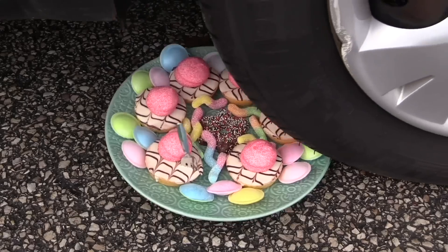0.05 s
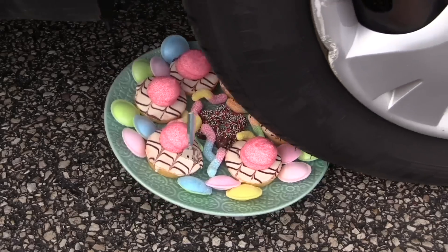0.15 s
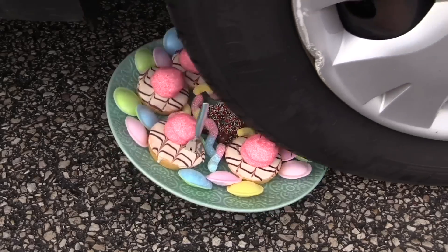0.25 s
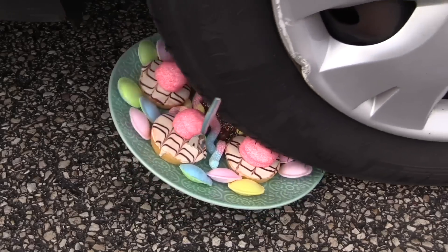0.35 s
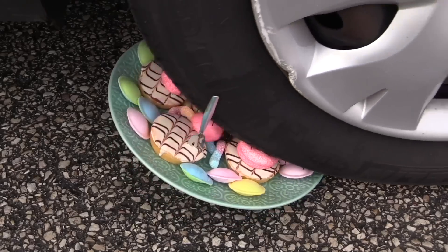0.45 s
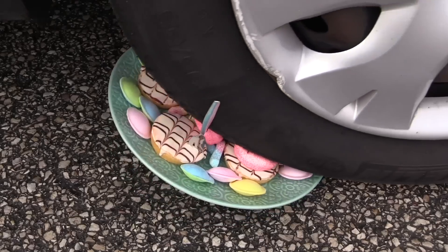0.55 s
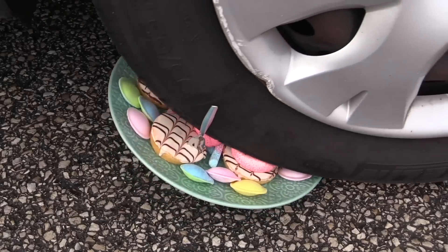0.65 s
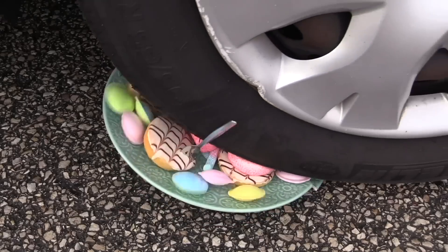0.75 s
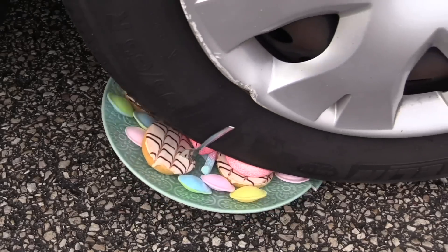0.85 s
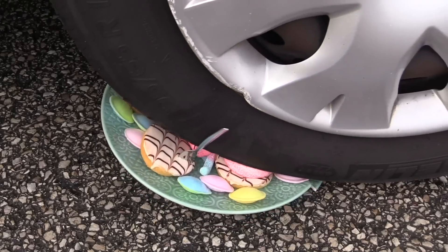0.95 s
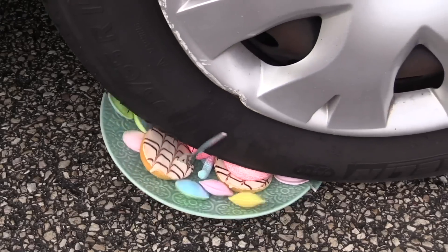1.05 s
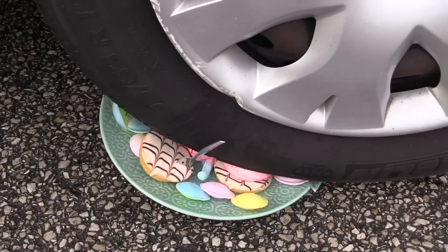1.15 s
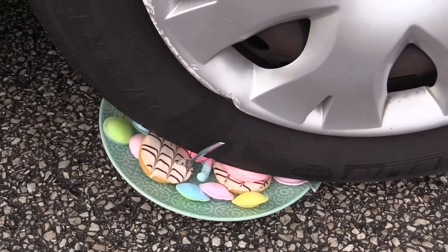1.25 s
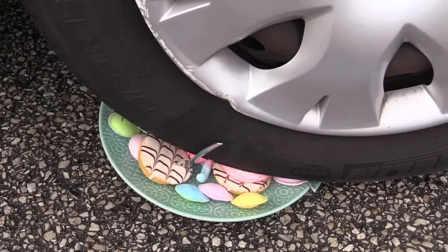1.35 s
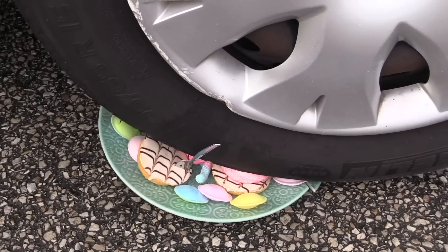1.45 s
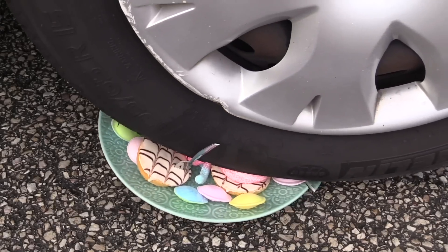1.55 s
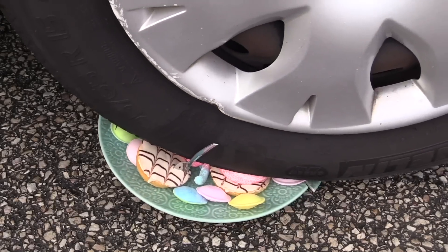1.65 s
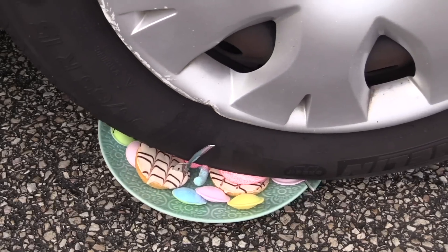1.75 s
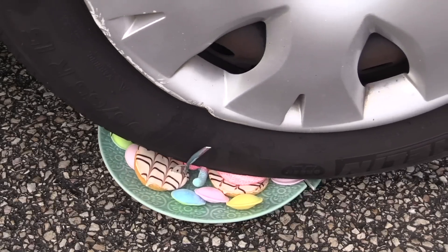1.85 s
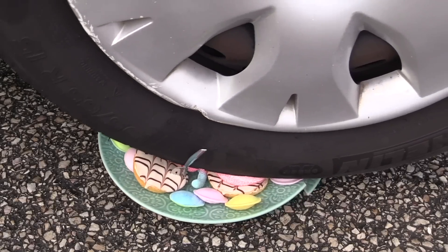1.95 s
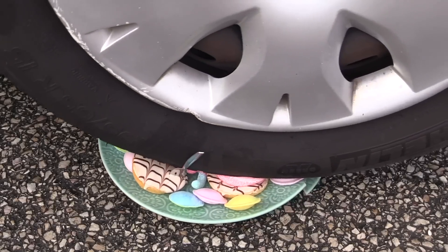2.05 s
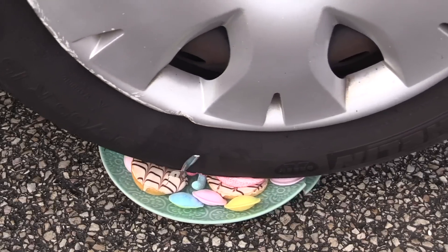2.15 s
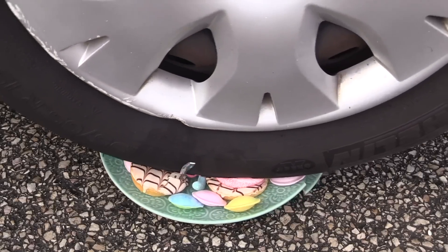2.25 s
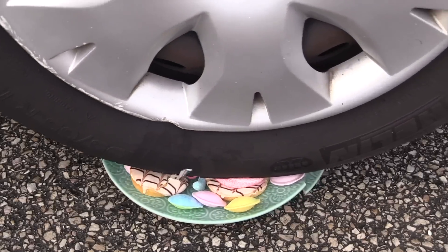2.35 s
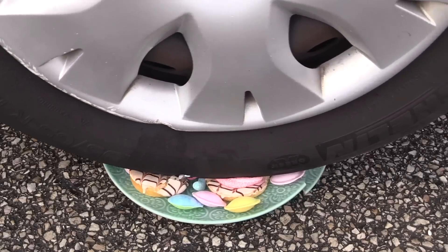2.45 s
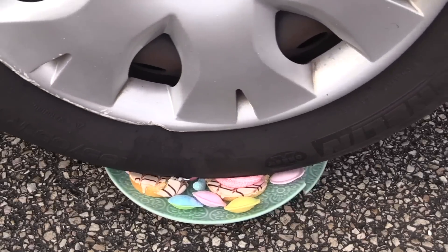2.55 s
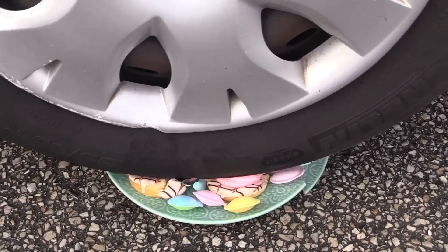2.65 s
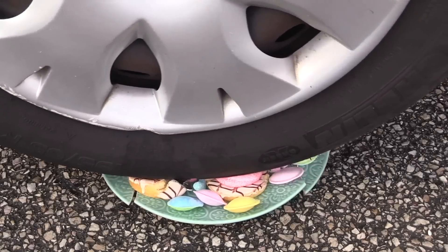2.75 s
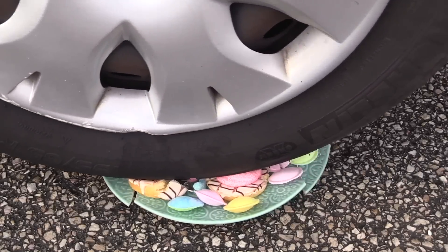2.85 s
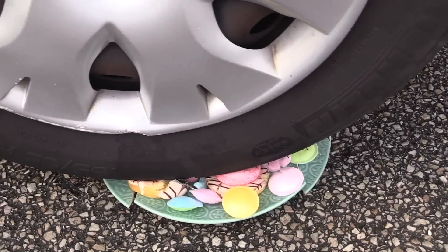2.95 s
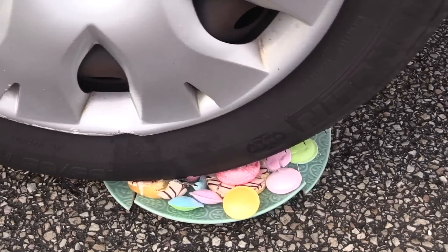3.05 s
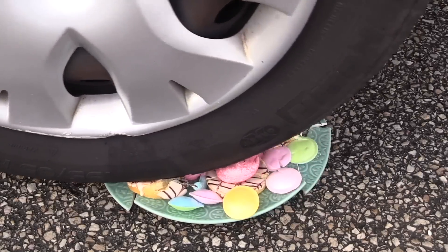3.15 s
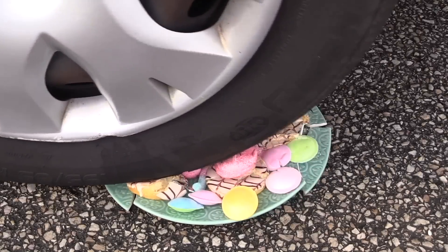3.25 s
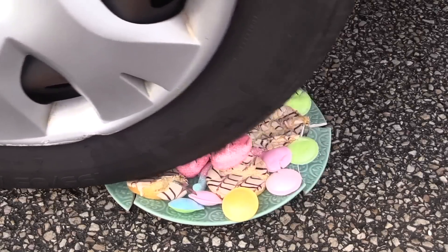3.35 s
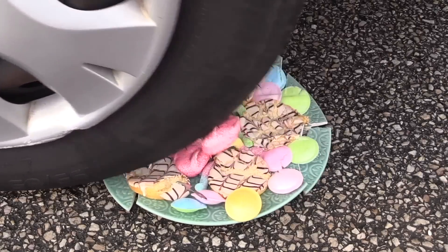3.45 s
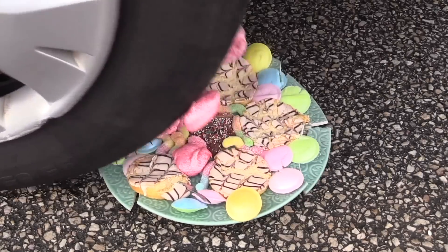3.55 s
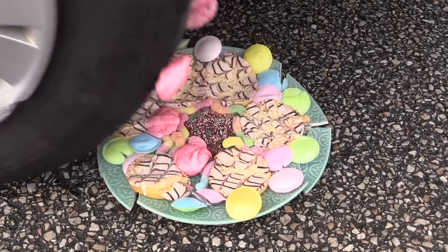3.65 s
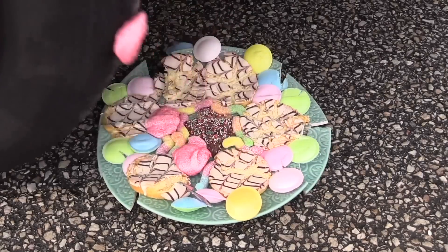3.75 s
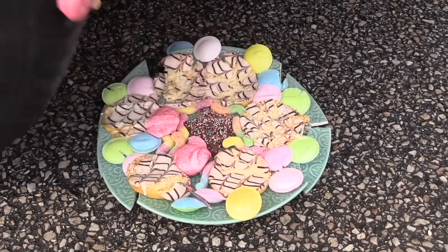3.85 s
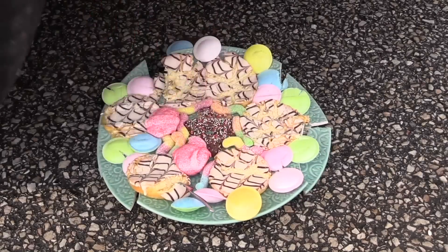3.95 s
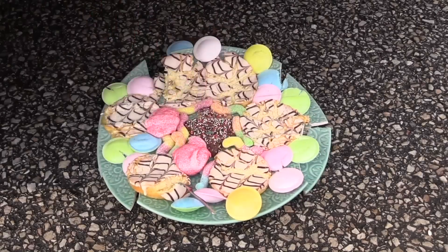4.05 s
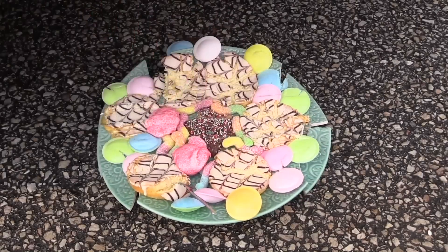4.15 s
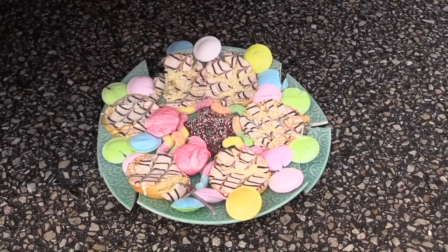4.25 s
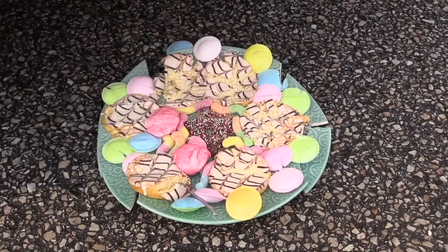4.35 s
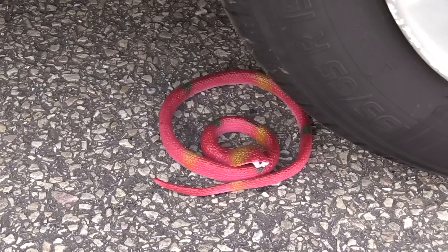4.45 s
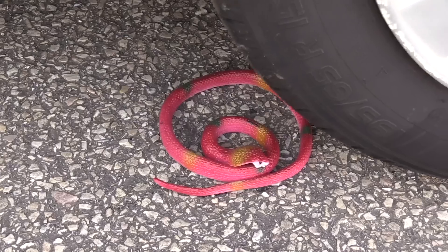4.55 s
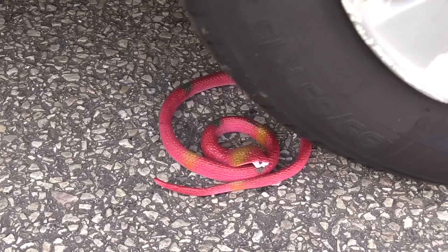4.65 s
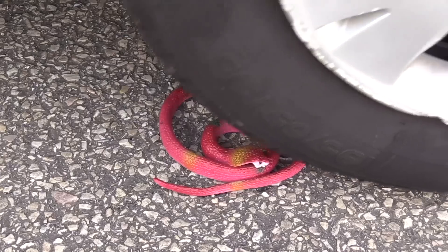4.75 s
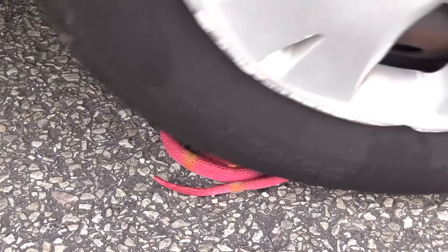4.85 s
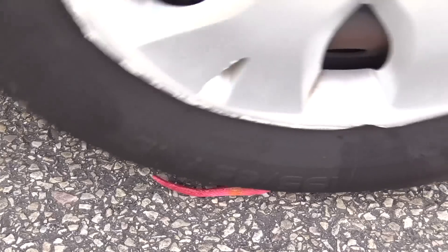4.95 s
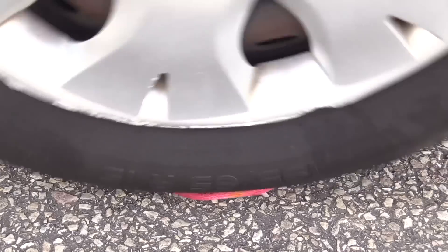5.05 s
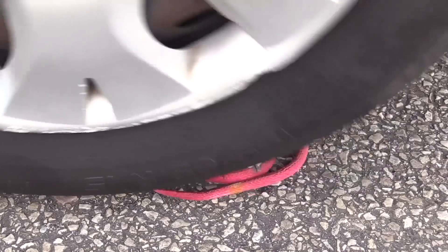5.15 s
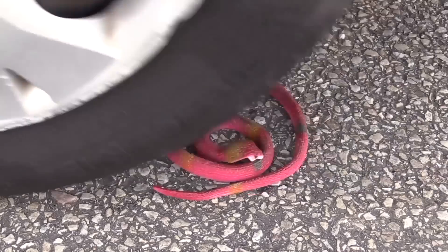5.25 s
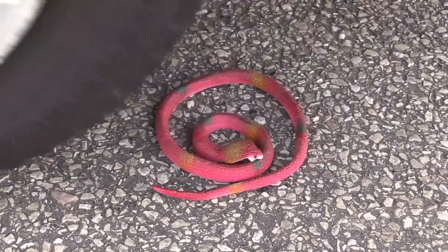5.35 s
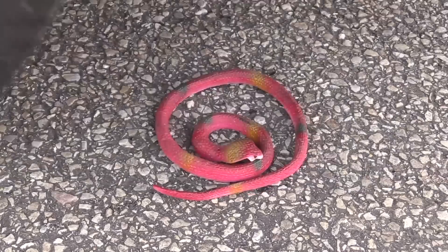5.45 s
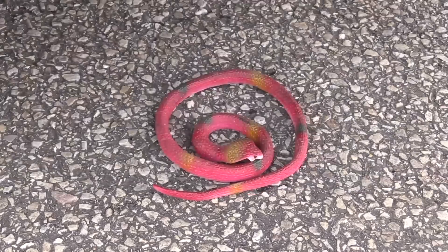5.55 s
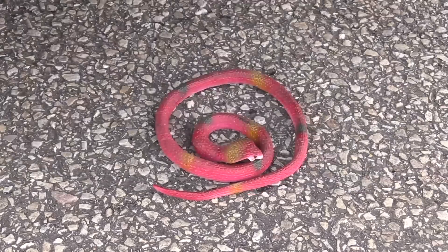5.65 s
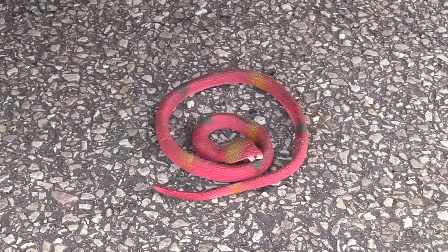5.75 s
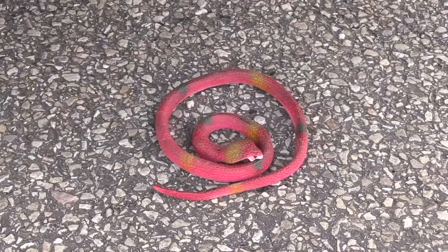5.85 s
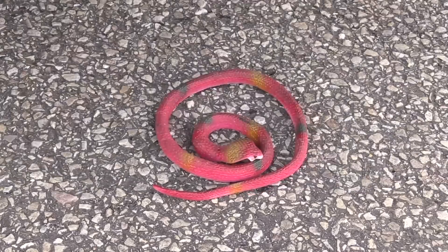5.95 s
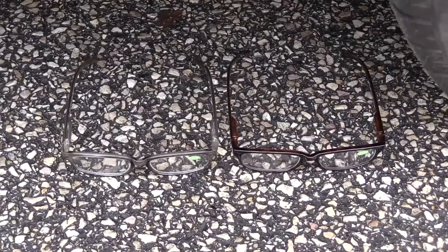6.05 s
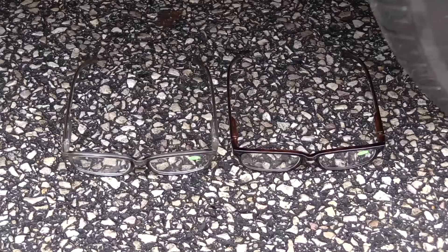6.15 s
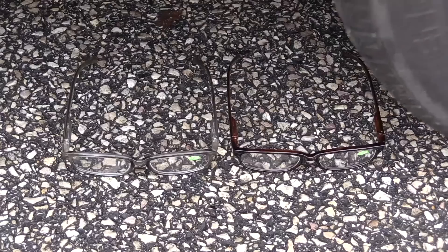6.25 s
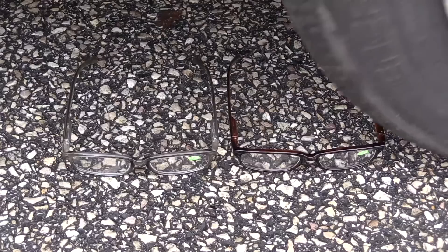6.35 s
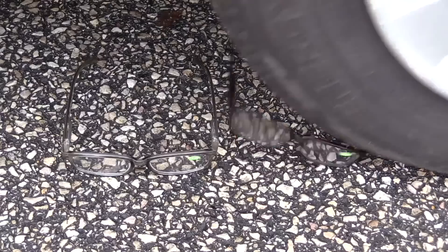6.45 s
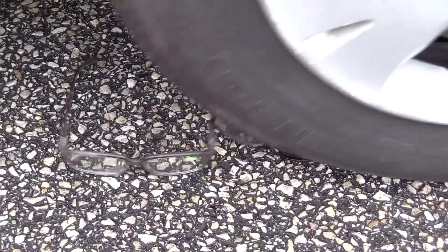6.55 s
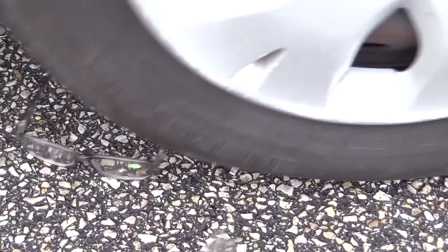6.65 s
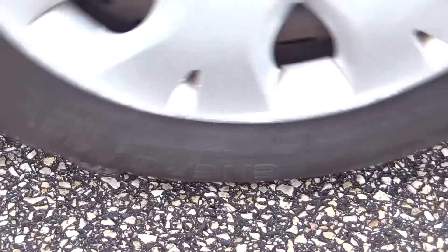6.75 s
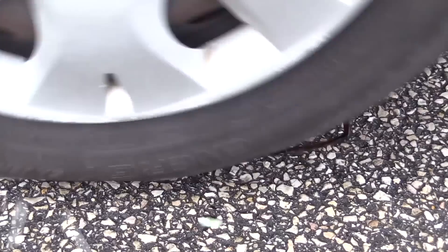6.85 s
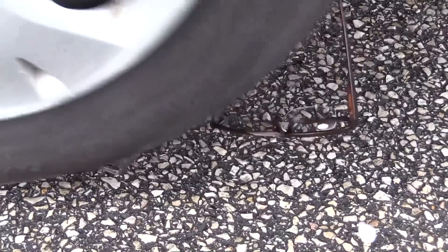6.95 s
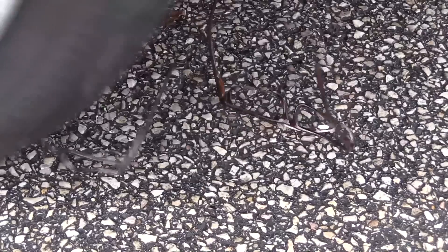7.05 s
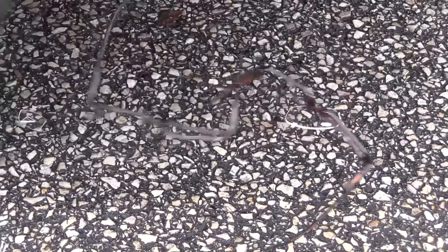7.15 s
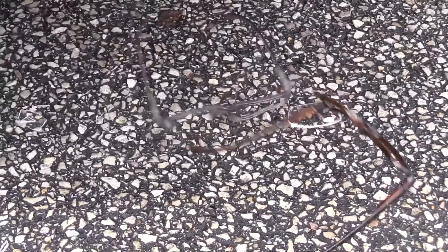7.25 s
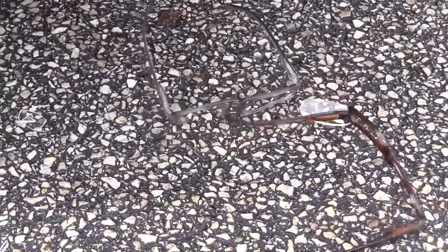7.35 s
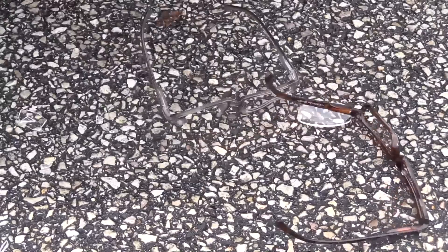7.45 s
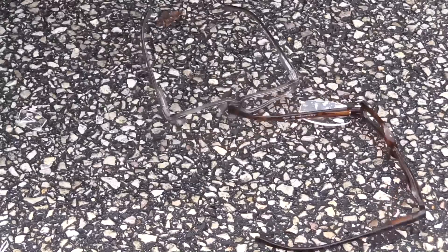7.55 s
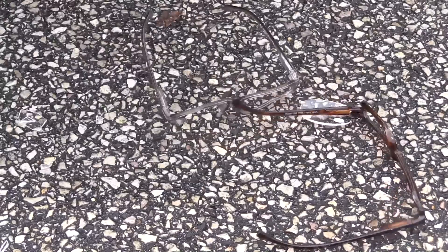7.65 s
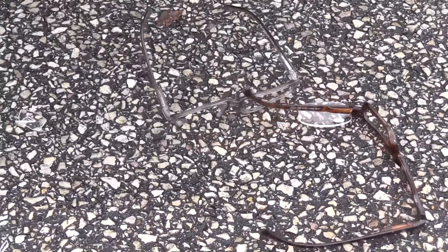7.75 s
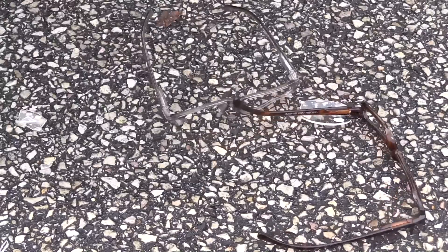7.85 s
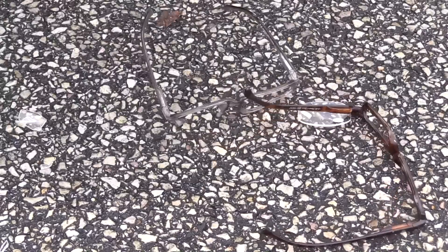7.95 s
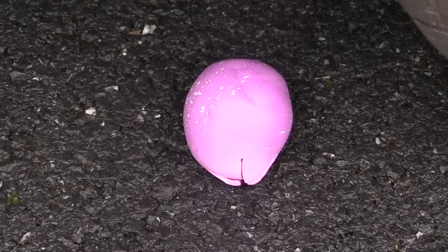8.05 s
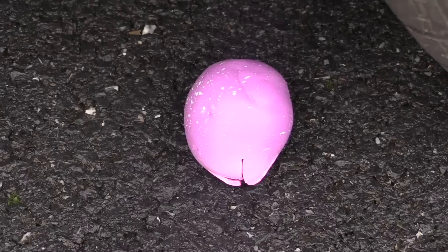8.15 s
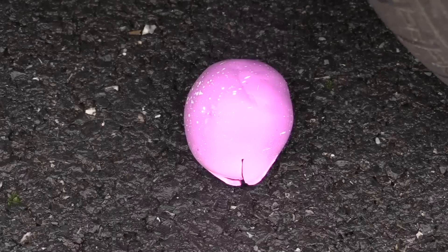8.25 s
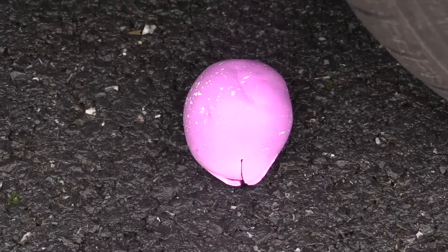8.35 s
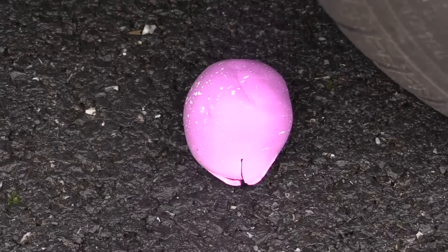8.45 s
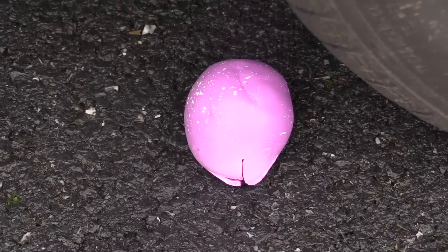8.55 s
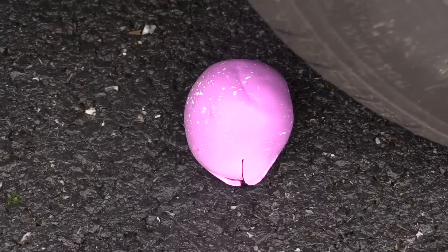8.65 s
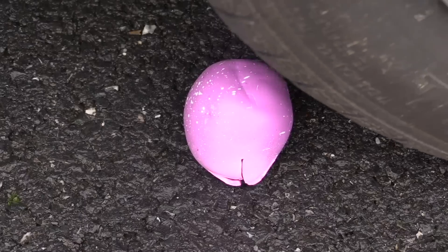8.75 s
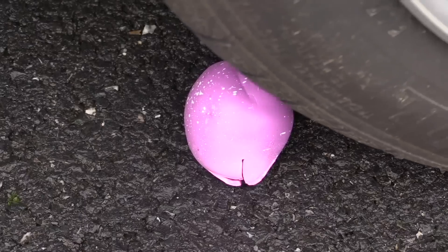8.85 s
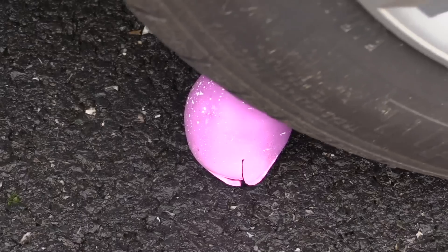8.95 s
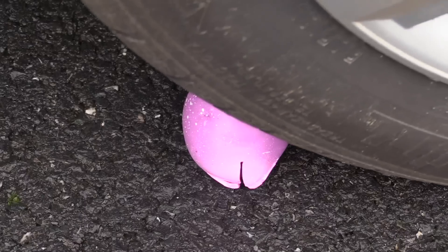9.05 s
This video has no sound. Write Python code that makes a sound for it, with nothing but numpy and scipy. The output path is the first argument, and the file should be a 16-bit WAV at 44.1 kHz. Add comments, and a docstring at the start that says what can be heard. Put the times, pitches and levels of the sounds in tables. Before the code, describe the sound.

Four abruptly cut stereo shots beside a slow car on a road. First, hard china pops, crunches and rings under the tyre for over three seconds, with gritty debris and a hollow tyre hum. Next comes only chugging, hissing engine noise, fading a little. Then brittle frames crack and a tiny lens rattles lightly. Finally a quieter, ticking engine nears. Brief total silence separates the shots; everything is near and dry.

```python
"""On an asphalt road, heard in four short shots cut apart by silence, a car creeps past with a chugging engine.
The tyre breaks a china plate of sweets, rolls over a rubber snake, snaps two pairs of spectacles whose lens
rattles to rest, and nears a soft pink lump. Breaks are filtered noise bursts, china and glass are fading
sine waves, and the engine is noise and low tones that pulse with each firing."""
import sys
import numpy as np
from scipy import signal
from scipy.fft import rfft, irfft, next_fast_len
from scipy.io import wavfile
from scipy.ndimage import uniform_filter1d, map_coordinates

SR = 44100
rng = np.random.default_rng(int(sys.argv[2]) if len(sys.argv) > 2 else 0)


def put_to_file(sound):
    """Save the sound as 16-bit audio at rate SR, in the file named by the first command-line argument."""
    columns = np.atleast_2d(sound).T  # one column per channel
    safe = np.clip(columns, -1, 1)
    whole_steps = np.round(safe * 32767)
    wavfile.write(sys.argv[1], SR, whole_steps.astype(np.int16))


N = 401751
T = np.arange(N) / SR  # time of every sample, s

# the four shots: start_s, end_s, firing_s (a moment when a firing begins)
SHOTS = [(-1, 3.777, 0), (4.464, 6.096, 4.47), (6.157, 8.054, 6.16), (8.105, 10, 8.129)]
# breaks under the tyre, with a few late knocks of the lens:
# start_s, level_db, ring_hz, then thud_db, splinter_db, ring_db above that level
BREAKS_AND_KNOCKS = [(0.1107, -12, 796, -30, -40, 8.5), (0.428, -10.5, 751, -8, -1.5, -8.5),
                     (0.468, 3, 760, -30, -20, -9), (0.52, -3.5, 783, -28, -13.5, -9.5),
                     (0.554, -5, 820, -22.5, -13, -8.5), (0.583, -8, 800, -10.5, -19, -5),
                     (0.623, -8.5, 789, -11, -5.5, -10), (0.660, -1, 2630, -33, -6, -1),
                     (0.713, -1, 810, -22.5, -14, -11), (0.757, -6.5, 907, -24.5, -9.5, -6),
                     (0.790, 3, 816, -20.5, -9.5, -16.5), (0.819, -2.5, 820, -19.5, -17.5, -10.5),
                     (0.837, 10, 750, -8.5, -16.5, -9), (0.912, -6.5, 744, -1.5, -8.5, -19.5),
                     (0.962, 5.5, 820, -28, -21, -13), (0.983, 0, 905, -29.5, -14.5, -11),
                     (1.032, -11, 2170, -11, -17, -0.5), (1.058, -1, 860, -14, -13.5, -8),
                     (1.101, -1, 850, -17, -13.5, -10), (1.122, 2, 2180, -30.5, -14, -7.5),
                     (1.1531, 6.5, 885, -27.5, -20.5, -5), (1.354, 4.5, 960, -26, -7.5, -12),
                     (1.614, 6.5, 980, -28, -11, -6.5), (1.729, -13.5, 1000, -20, 1, -12),
                     (1.803, 0, 2190, -23.5, -9.5, -3), (1.831, -7.5, 2130, -21, -11, -6.5),
                     (1.85, -8.5, 840, -19.5, 0, -10), (1.994, 5, 2500, -29, -21, -4.5),
                     (2.144, 2.5, 2500, -24, -26.5, -5.5), (2.21, 3, 1110, -25, -22.5, -8.5),
                     (2.237, -4.5, 2560, -28, -24.5, -5.5), (2.25, -1, 2020, -24.5, -30.5, -5.5),
                     (2.256, -3.5, 2080, -22, -32.5, -1), (2.374, -6, 1890, -16, -10.5, -6.5),
                     (2.413, -1, 2480, -27.5, -13, -8), (2.45, -0.5, 2500, -22, -19.5, -7),
                     (2.46, 4.5, 3100, -30, -29.5, -10), (2.556, -8.5, 2450, -26, -24, -4.5),
                     (2.63, -1, 2790, -37, -7, -3), (2.67, -13.5, 3700, -15, -4, 2.5),
                     (2.707, 8.5, 1800, -14, -13, -13), (2.755, -8.5, 2320, -12, -15, -1),
                     (2.766, -8.5, 2270, -23, -11, -1), (2.831, 9.5, 550, -14, -14.5, -17.5),
                     (2.883, -4, 2560, -12.5, -10.5, -3), (2.908, -6, 2690, -21.5, -7, 0),
                     (2.919, -1.5, 2480, -23.5, -8.5, -1), (2.936, -6, 2660, -22.5, -7.5, -3),
                     (2.987, 9, 1890, -17.5, -26.5, -23.5), (3.14, -13.5, 2980, -21, -12, 4),
                     (3.243, 5.5, 2820, -11.5, -6.5, 0), (3.358, 3.5, 1010, -20.5, -15, -1.5),
                     (3.384, -6, 1140, -19.5, -17.5, -2.5), (3.398, 2, 925, -9, -13, -3),
                     (3.496, -2, 1380, -19, -23, -11), (3.642, -12.5, 4700, -25, -20, -2),
                     (3.659, 2.5, 1300, -37.5, -24, -2.5), (3.69, -0.5, 1337, -19.5, -39.5, -3.5),
                     (6.584, -11.5, 3300, -17, -4.5, -6), (6.594, -1.5, 3300, -14, -9.5, -4),
                     (6.604, -6, 950, -19, -11.5, -3), (6.6407, 6.5, 774, -13, -8, -16),
                     (6.694, -9.5, 9600, -8.5, -8.5, 4.5), (6.719, 2, 900, -10, -17.5, -5),
                     (6.759, -1.5, 530, -8, -7, -9.5), (6.829, -8.5, 556, -6.5, -18, -0.5),
                     (6.853, -8.5, 4700, -27, 5, -3.5), (6.883, -12, 2000, -10, -15, 2),
                     (6.906, -2.5, 970, -8, -6.5, -5.5), (6.959, -3, 530, -3, -11, -4),
                     (7.096, -6, 810, -14, -33, -5.5), (7.146, -13, 780, -16, -6.5, -8.5),
                     (7.18, -16.5, 2910, -29, 5, -16), (7.364, -14, 3370, -37, -3, -2),
                     (7.493, -12, 1070, -8.5, -24.5, -7)]
# landings of a loose china shard that skips on the asphalt: start_s, level_db
SHARD_LANDINGS = [(2.007, -24), (2.031, -6.5), (2.0632, -8.5), (2.076, -5), (2.09, -13.5), (2.114, -26.5),
                  (2.128, -19.5), (2.152, -23.5), (2.165, -18.5), (2.19, -33.5), (2.2244, -29.5),
                  (2.2573, -31), (2.295, -35)]
# notes of the china shard: pitch_hz, level_db, t60_s (time to fade by 60 dB)
SHARD_NOTES = [(2885, -12.5, .35), (3300, -18, .05), (6218, -19, .1), (6946, 0, .13), (7106, -15, .07),
               (11600, -27, .12)]
# splinters that sing one note until they touch something: start_s, level_db, pitch_hz, length_s
CHIPS = [(0.1093, -14.5, 1838, .006), (0.118, -7.5, 905, .013), (.468, -7.5, 764, 0.025),
         (1.851, -21.5, 6820, .02), (2.717, -16.5, 4510, .032), (2.719, -19.5, 1956, 0.041),
         (2.71, -13.5, 3370, .02), (2.908, -17, 2717, .034), (6.642, -15.5, 7700, .008),
         (6.757, -21.5, 7250, 0.0078), (6.853, -16, 2760, 0.0054), (6.855, -16, 4730, 0.0074),
         (6.99, -25, 4700, 0.035), (6.991, -30, 1580, .045), (7.025, -21.5, 3660, 0.017),
         (7.019, -28, 10200, .016)]
# knocks of the lens as it bounces to rest: start_s, level_db, ring_hz
LENS_KNOCKS = [(7.122, -21.5, 7600), (7.134, -14.5, 7900), (7.168, -11.5, 7800), (7.222, -14.5, 8760),
               (7.246, -12, 7630), (7.27, -21.5, 5840), (7.3651, -13.5, 7120), (7.377, -12.5, 8160),
               (7.3807, -4.5, 11030), (7.41, -21, 7900), (7.421, -19, 8250), (7.43, -16, 7600),
               (7.456, -19, 7780), (7.468, -23, 7670), (7.512, -22.5, 5550), (7.5175, -6.5, 5040),
               (7.553, -11.5, 7710), (7.6242, -15, 7100), (7.6358, -9.5, 7170), (7.64, -8, 7110),
               (7.657, -17, 7140), (7.672, -17, 7330), (7.682, -23, 7240), (7.7318, -11.5, 6940),
               (7.7415, -17, 5800), (7.746, -7.5, 5600), (7.7797, -17, 6500), (7.788, -18, 5860),
               (7.8054, -22, 5900), (7.823, -25, 6000), (7.8302, -20, 6000), (7.8457, -18.5, 6060),
               (7.8583, -24, 7160), (7.883, -29, 5760), (7.8931, -23, 7150)]
# notes of the lens shared by all knocks: pitch_hz, level_db, t60_s
LENS_NOTES = [(5900, -4, .014), (7250, -6, 0.034), (10700, -9, 0.015)]
# crumbling between the breaks, and grit under the skittering lens, one curve each: time_s, level_db
CRUMBLE_LEVEL = [
    [(.38, -44), (.9, -36), (1.3, -38), (2.6, -46), (2.9, -33), (3.74, -40)],
    [(6.54, -45.5), (7.2, -39.5), (7.45, -41), (7.95, -48.5)],
]
# tone colour of the crumbling: pitch_hz, level_db
GRIT_COLOUR = [(710, -48.5), (1200, -26), (2760, -12), (11700, -14.5), (16000, -40)]
# shudders of the tyre wall as it drops off a broken piece: start_s, level_db, band_top_hz, t60_s
JOLTS = [(0.881, -19.5, 292, 0.36), (2.73, -22.5, 106, 1), (6.642, -14.5, 290, 0.74),
         (6.902, -17.5, 294.4, 0.41), (7.002, -25, 114, 0.35)]
# hums of the air ring inside the tyre, set off by a jolt: peak_s, level_db, swell_s, t60_s
TYRE_HUMS = [(.93, -23, 0.12, 0.78), (2.78, -36.5, .07, 2.5), (7.05, -31, 0.12, 0.61)]
# the two notes of that air ring: pitch_hz, level_db
TYRE_NOTES = [(228, 9.5), (447, -2)]
# engine speed: time_s, firings_per_s
ENGINE_SPEED = [(0, 43), (.6, 38), (1.6, 43), (2, 41), (2.4, 32), (2.9, 27.5), (3.8, 32), (4.46, 33),
                (4.7, 37.5), (5.25, 26.5), (5.5, 29), (6.1, 28), (6.16, 25), (6.6, 28), (7.1, 22),
                (8.06, 20.5), (8.1, 24.6), (9.11, 24.8)]
# low tones of the engine: multiple of the firing rate, level_db
ENGINE_TONES = [(1, -1.5), (2, 1), (3, 0), (5, -9)]
# engine loudness as the car creeps past, one curve a shot: time_s, block_db, exhaust_db
ENGINE_LEVEL = [
    [(0, -25, -32), (.8, -24.5, -30.5), (1.3, -20, -31), (2, -21.5, -32.5), (2.55, -30, -32.5),
     (3.2, -26.5, -32), (3.52, -22.5, -33), (3.77, -28, -33)],
    [(4.47, -26, -32), (4.9, -25, -29.5), (5.3, -28.5, -37), (5.6, -32, -39.5), (6.09, -33, -37)],
    [(6.16, -32, -35), (6.5, -27, -29.5), (7, -26.5, -35), (7.3, -41, -43.5), (8.05, -36.5, -39.5)],
    [(8.11, -31.5, -29.5), (8.9, -32, -30.5), (9.11, -34.5, -39)],
]
# how each shot hears the engine: valves_db above the block, hum_db above the exhaust,
# clatter (0-1), further_left_db
SHOT_MIX = [(-13.5, -14, 0.37, 1), (-13, -6, 0.32, 0.55), (-11, -11, 0.4, 0.5), (-10.5, -30, 0.65, -1)]
# tone colours of exhaust, engine block, steady valve hiss and tappet ticks: pitch_hz, level_db
EXHAUST_COLOUR = [(40, -27), (90, -9), (150, -5.5), (285, -10), (350, -9), (800, -15.5), (1600, -120)]
BLOCK_COLOUR = [(210, -28.5), (350, -5.5), (437, -6.5), (1260, -6), (1450, -16), (1900, -12.5), (2130, -7),
                (2450, -13), (2850, -11), (5000, -33.5), (6500, -73), (11000, -120)]
VALVE_COLOUR = [(2000, -30), (3600, -3), (5200, -6.5), (6500, -3), (8600, -7), (12200, -20.5), (16000, -31)]
TAPPET_COLOUR = [(880, -41.5), (1500, -1), (1780, 2.5), (2940, -16), (3400, -12), (3900, -13.5),
                 (5600, -22.5), (6400, -17), (7400, -20.5), (9500, -24), (10400, -21), (16000, -51)]
# how alike left and right are in the engine noise: pitch_hz, likeness (0-1)
LIKENESS = [(40, .6), (150, 0.99), (350, 0.8), (1000, 0.32), (8000, 0.52), (15000, 0.73)]
# how much louder the engine noise is on the left: pitch_hz, left_minus_right_db
LEFTWARD = [(60, 2), (380, 0.5), (1300, 7), (2400, 6.5), (5000, 3), (15000, 1)]
# low booming along with the engine; in the last shot a rumble of the nearing engine:
# start_s, end_s, low_note_db, high_note_db (both above the block)
BOOMS = [(0, 2.9, -11.5, -11), (4.47, 5.04, -7, -15.5), (6.3, 6.8, -6, -15), (8.11, 9.3, -23, -5.5)]
# the two broad notes of the booming: pitch_hz, width_hz
BOOM_NOTES = [(365, 59), (780, 100)]
# brief dips in the level of the steadier sounds: middle_s, change_db, half_width_s
DIPS = [(1.19, -13.5, 0.02), (6.87, -18, 0.019)]

CRACK_DB = -4  # the dry crack, against the level of its break
BREAK_T60_S = 0.088  # basic fading time, stretched a little for each layer
SNAP, SNAP_T60_S = 4.16, 0.0056  # the first instant is the hardest: its excess strength and fading time
BLOW = 17  # strength of the single blow that starts ring, crack and splinters
SHARD_DAMP_DB, SHARD_DAMP_S = -3, .004  # each landing takes this much from the ringing, within this time
CHIP_T60_S = 0.21
SHOWER_DB, SHOWER_T60_S = -11, 0.097  # debris after a break or knock, above its splinters
HUM_GROWTH, HUM_PIVOT_DB = 0.71, -36  # extra dB of hum for each dB of the exhaust above this level
PATCHY_DB = 1.86  # typical change of the engine noise from patch to patch
BOOM_FADE_S = 0.12
TOP_HZ = 16300  # nothing above this pitch is kept


def amp(db):
    """Turns decibels into a gain."""
    return 10 ** (np.asarray(db) / 20)


def unit(x):
    """Brings the average (rms) strength to 1."""
    return x / np.sqrt(np.mean(x ** 2) + 1e-20)


def along(points, hz):
    """Reads a curve of (pitch, value) points on a logarithmic pitch axis."""
    f, v = np.transpose(points)
    return np.interp(np.log(hz + 1), np.log(f + 1), v)


def curves(tables):
    """Gives each column a value at every sample, from tables that follow one another."""
    columns = -120  # practically silent outside the tables
    for rows in tables:
        s, *values = np.transpose(rows)
        inside = (T >= s[0] - .02) & (T <= s[-1] + .02)
        columns = np.where(inside, [np.interp(T, s, v) for v in values], columns)
    return columns


def wobble(rate):
    """Draws a smooth random curve with rate random points a second."""
    return map_coordinates(rng.standard_normal(int(N * rate / SR) + 4), [T * rate])


def filtered(x, response):
    """Multiplies the spectrum of x by a function of pitch."""
    m = next_fast_len(N + SR // 4)
    return irfft(rfft(x, m) * response(np.fft.rfftfreq(m, 1 / SR)), m)[..., :N]


def band(x, lo_hz, hi_hz):
    """Keeps the pitches between two limits and brings the peak to 1."""
    sos = signal.butter(2, [lo_hz, hi_hz], "bandpass", fs=SR, output="sos")
    y = signal.sosfilt(sos, x)
    return y / np.abs(y).max()


def ring(notes, t, scatter_db):
    """Rings a struck object: fading sine waves of slightly random strength, with a very quick swell."""
    rise = 1 - np.exp(-t / .0005)
    total = 0
    for hz, db, t60 in notes:
        level_db = db + rng.normal(0, scatter_db) - 60 * t / t60
        total = total + amp(level_db) * np.sin(2 * np.pi * hz * t)
    return rise * total


def burst(t, t60, spread):
    """Makes a fading noise burst; spread is the strength of the part that differs between left and right."""
    noise = rng.standard_normal(len(t)) + spread * rng.standard_normal((2, len(t)))
    return amp(-60 * t / t60) * noise


def add(out, s, sound, pan_db=0.):
    """Lays a sound into the stereo track; positive pan_db leans left."""
    out[:, round(s * SR):][:, :sound.shape[-1]] += amp([[pan_db / 2], [-pan_db / 2]]) * sound


def cracks():
    """Breaks and a few lens knocks are bursts: a thud, a damped ring, a crack with chance notes, splinters."""
    out, t = np.zeros((2, N + SR)), np.arange(SR // 8) / SR
    blow = BLOW * (t == 0)
    snap = 1 + SNAP * amp(-60 * t / SNAP_T60_S)
    for s, db, hz, thud_db, splinter_db, ring_db in BREAKS_AND_KNOCKS:
        struck = blow + snap * burst(t, 1.05 * BREAK_T60_S, spread=0.24)
        piece = amp(ring_db) * band(struck, hz * 0.85, hz * 1.165)
        thud = amp(thud_db) * band(snap * burst(t, 1.2 * BREAK_T60_S, spread=0.12), 230, 600)
        fracture = blow + snap * burst(t, 1.34 * BREAK_T60_S, spread=0.3)
        facets_hz = 1250 * 2.694 ** rng.random(4)
        facets = sum(band(fracture, f * 0.923, f * 1.08) for f in facets_hz)
        crack = amp(CRACK_DB) * (0.82 * band(fracture, 850, 3200) + 0.2 * facets)
        bright = blow + snap * burst(t, 1.5 * BREAK_T60_S, spread=.45)
        splinters = amp(splinter_db) * band(bright, 4300, 11500)
        add(out, s, amp(db) * (piece + thud + crack + splinters), pan_db=rng.normal(2.6, 2.8))
    return out[:, :N]


def china_shard():
    """Hard china rings clearly on its own notes, and every later landing damps the ringing."""
    out, t = np.zeros((2, N + SR)), np.arange(SR // 4) / SR
    for s, db in SHARD_LANDINGS:
        damp_db = sum(SHARD_DAMP_DB * np.clip((t + s - later) / SHARD_DAMP_S, 0, 1)
                      for later, _ in SHARD_LANDINGS if later > s)
        ringing = amp(damp_db) * ring(SHARD_NOTES, t, scatter_db=4.0)
        tick = 0.13 * band(burst(t, 0.022, spread=.4), 4000, 8500)
        add(out, s, amp(db) * (ringing + tick), pan_db=-4.0)
    return out[:, :N]


def chips():
    """Each small splinter sings a note with a close, weaker neighbour until a touch damps it."""
    out, t = np.zeros((2, N + SR)), np.arange(SR // 4) / SR
    for s, db, hz, length in CHIPS:
        touch_db = -40 * np.clip((t - length) / 0.016, 0, 1)
        note = ring([(hz, 0, CHIP_T60_S), (hz * 1.014, -9, CHIP_T60_S)], t, scatter_db=0.0)
        tick = 0.56 * band(burst(t, 0.038, spread=.4), hz * 1.1, hz * 1.7)
        add(out, s, amp(db + touch_db) * (note + tick))
    return out[:, :N]


def lens_rattle():
    """The bouncing lens rings rough and short: brief notes mixed with narrow and bright noise."""
    out, t = np.zeros((2, N + SR)), np.arange(SR // 4) / SR
    for s, db, hz in LENS_KNOCKS:
        notes = 0.24 * ring(LENS_NOTES + [(hz, 0, .021)], t, scatter_db=4.5)
        rough = 0.61 * band(5 * (t == 0) + burst(t, .016, spread=.4), hz * .93, hz * 1.07)
        tick = band(4 * (t == 0) + burst(t, 0.01, spread=.4), 4100, 9500)
        bright = 0.58 * band(tick, 3500, 12500)
        add(out, s, amp(db) * (notes + rough + bright), pan_db=1.7)
    return out[:, :N]


def crumble():
    """Tiny fractures, each a few cycles at its own pitch: a thin bed, and a shower after each break or knock."""
    after = np.zeros(N)
    for s, db, *_, splinter_db, _ in BREAKS_AND_KNOCKS:
        after[round(s * SR)] = amp(db + splinter_db + SHOWER_DB)
    shower = signal.lfilter([1], [1, -amp(-60 / (SHOWER_T60_S * SR))], after)
    load = amp(curves(CRUMBLE_LEVEL)) + shower
    when, tone, size, side = rng.random((4, 40000))  # one column for each grain
    t, hz = np.arange(100) / SR, (1500 * 8 ** tone)[:, None]
    cycles, uneven_db = 4.5, 3.6
    grain_db = -uneven_db * np.log(size + 0.025)[:, None] - 60 * t * hz / (3 * cycles)
    grain = amp(grain_db) * np.sin(2 * np.pi * hz * t)
    at = ((when * N).astype(int)[:, None] + np.arange(len(t))).ravel()
    pair = [np.bincount(at, (grain * way[:, None]).ravel(), N + len(t))[:N]
            for way in (.3 + side, 1.3 - side)]  # left and right
    return load * unit(filtered(np.array(pair), lambda hz: amp(along(GRIT_COLOUR, hz))))


def jolts():
    """The tyre wall gives low shudders: fading noise in one resonance."""
    out, t = np.zeros((2, N + SR)), np.arange(SR // 2) / SR
    for s, db, hz, t60 in JOLTS:
        noise = amp(-60 * t / t60) * rng.standard_normal(len(t))
        add(out, s, amp(db) * band(noise, hz * 0.826, hz), pan_db=4.0)
    return out[:, :N]


def tyre():
    """The air ring hums on nearly a pure tone with a weaker second one; it swells, then dies away."""
    hum = sum(amp(db + 1.63 * wobble(25)) * np.sin(2 * np.pi * hz * T + 0.46 * wobble(5.4))
              for hz, db in TYRE_NOTES)
    level = 0
    for s, db, swell, t60 in TYRE_HUMS:
        rise = np.clip(1 + (T - s) / swell, 0, 1) ** 2
        level = level + amp(db - 60 * np.maximum(T - s, 0) / t60) * rise
    return level * np.sqrt(2) * hum * amp([[.8], [-.8]])


def patches():
    """Makes two noises whose strength varies together in patches of pitch and time."""
    z = signal.stft(rng.standard_normal((2, N)), nperseg=256)[2]
    field = uniform_filter1d(rng.standard_normal(z.shape[1:]), size=4, axis=0)
    field = uniform_filter1d(field, size=6, axis=1)
    return signal.istft(z * amp(PATCHY_DB * unit(field)), nperseg=256)[1][:, :N]


def from_engine(gate, colour_table, lead_s):
    """Makes gated, coloured noise that reaches the left side first and louder."""
    def mid_and_side(hz):
        turn = np.arccos(np.clip(along(LIKENESS, hz), -1, 1)) / 2
        return amp(along(colour_table, hz)) * [np.cos(turn), np.sin(turn)]

    def lean_left(hz):
        way = np.array([[.5], [-.5]])
        return amp(way * along(LEFTWARD, hz)) * np.exp(2j * np.pi * hz * lead_s * way)

    mid, side = filtered(gate * patches(), mid_and_side)
    return unit(filtered(np.array([mid + side, mid - side]), lean_left))


def engine():
    """Firings drive low tones, plus noise puffs and tappet ticks of random strength, over a valve hiss."""
    turns = np.cumsum(np.interp(T, *np.transpose(ENGINE_SPEED))) / SR  # firings so far
    for start, _, firing in SHOTS:
        turns[T > start] -= turns[round(firing * SR)] % 1
    hum = sum(amp(db + 3.2 * wobble(4)) * np.sin(2 * np.pi * k * turns) for k, db in ENGINE_TONES)
    strength = amp(1.2 * rng.standard_normal(int(N * 45 / SR)))[turns.astype(int)]
    phase = turns % 1

    def puff(sharp):
        return strength * sharp * phase * np.exp(1 - sharp * phase)

    shot = sum(T > start for start, *_ in SHOTS) - 1
    block_db, exhaust_db = curves(ENGINE_LEVEL)
    valves_db, hum_db, clatter, left_db = np.transpose(SHOT_MIX)[:, shot]
    valves_db = valves_db + block_db
    hum_db = hum_db + exhaust_db + HUM_GROWTH * (exhaust_db - HUM_PIVOT_DB)
    clatter = np.clip(clatter, 0, 1)
    alive_db = 2.5 * wobble(13)
    exhaust = from_engine(0.8 + .25 * puff(sharp=4.9), EXHAUST_COLOUR, lead_s=0.000068)
    block = from_engine(1 + 1.5 * clatter * puff(sharp=3.5), BLOCK_COLOUR, lead_s=0.00037)
    valves = from_engine(1, VALVE_COLOUR, lead_s=0.000258)
    tappets = from_engine(.15 + puff(sharp=6.), TAPPET_COLOUR, lead_s=.00028)
    out = amp(exhaust_db) * exhaust + amp(block_db + alive_db) * block
    out += amp(valves_db + alive_db) * (1 - clatter) * valves
    out += amp(valves_db + 12) * clatter * tappets
    out += amp(hum_db) * hum * amp([[2.6], [-2.6]])
    return out * amp([left_db / 2, -left_db / 2])


def boom():
    """Low booming goes along with the engine: noise in two resonances that follows the block's level."""
    notes = [unit(band(rng.standard_normal(N), hz - width / 2, hz + width / 2)) for hz, width in BOOM_NOTES]
    level = 0
    for start, end, *notes_db in BOOMS:
        fade = np.clip(1 + np.minimum(T - start, end - T) / BOOM_FADE_S, 0, 1)
        level = level + fade * amp(notes_db)[:, None]
    block_db = curves(ENGINE_LEVEL)[0]
    return amp(block_db) * np.sum(level * notes, axis=0) * amp([[.6], [-.6]])


def scene():
    """Adds all sources; the brief dips touch only the crumbling, tyre hum, engine and boom."""
    dip_db = sum(db * np.exp(-((T - s) / width) ** 2) for s, db, width in DIPS)
    struck = cracks() + china_shard() + chips() + lens_rattle() + jolts()
    return struck + amp(dip_db) * (crumble() + tyre() + engine() + boom())


def record(dry):
    """The microphone loses the deepest bass, loud peaks are flattened, and silence parts the shots."""
    bass_hz = 45
    dry = filtered(dry, lambda hz: (1j * hz / (bass_hz + 1j * hz)) ** 2)
    clipped = dry / (1 + np.abs(dry) ** 8) ** (1 / 8)
    on = sum((T > start) & (T < end) for start, end, _ in SHOTS)
    return on * filtered(clipped, lambda hz: hz < TOP_HZ)


dry = scene()
out = record(dry)
put_to_file(out)
```